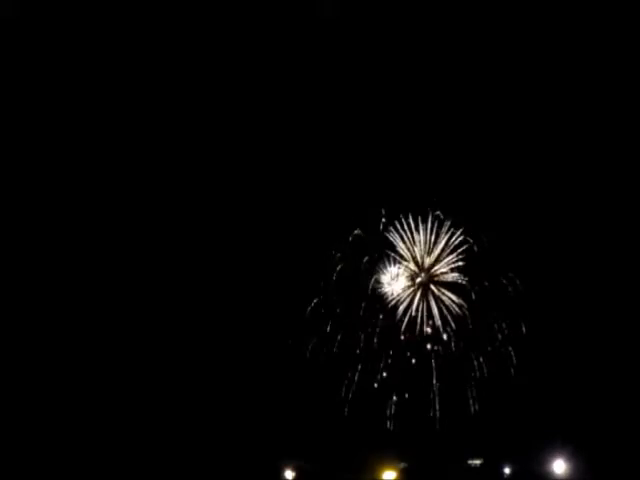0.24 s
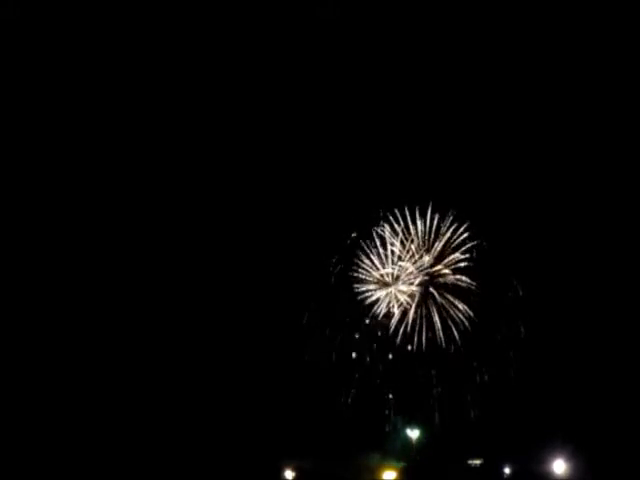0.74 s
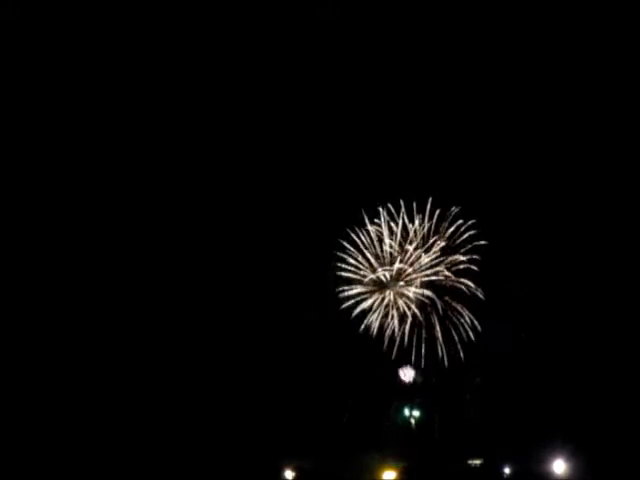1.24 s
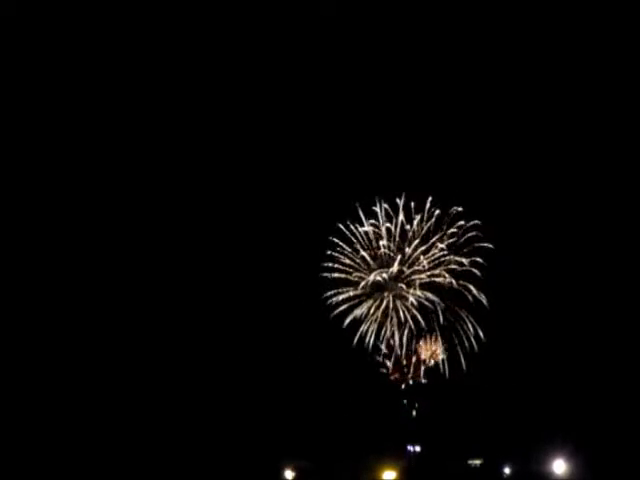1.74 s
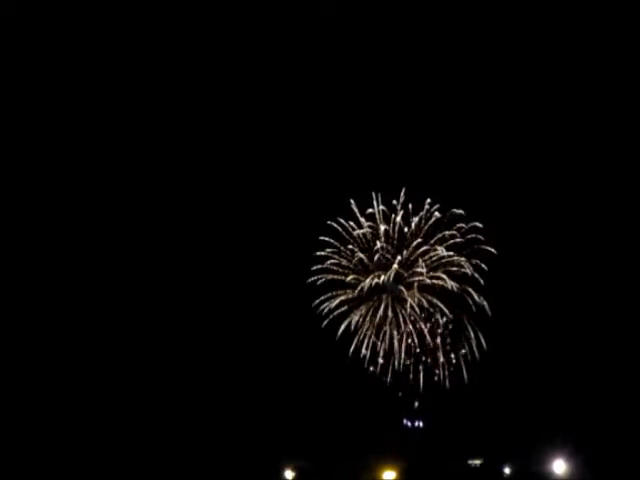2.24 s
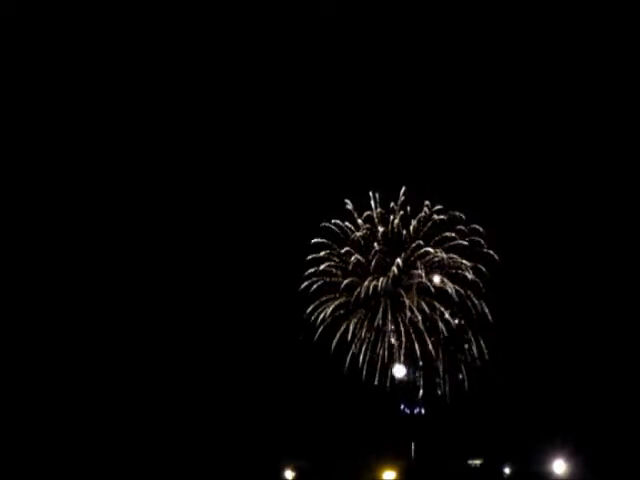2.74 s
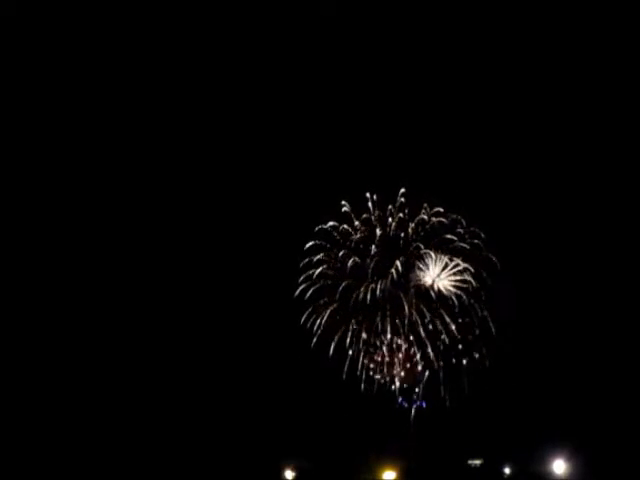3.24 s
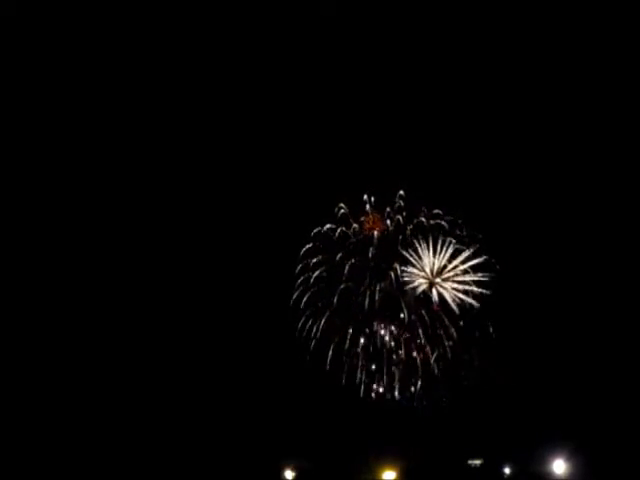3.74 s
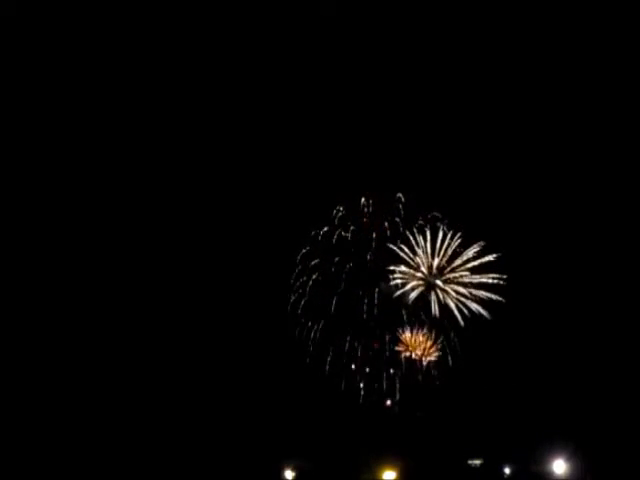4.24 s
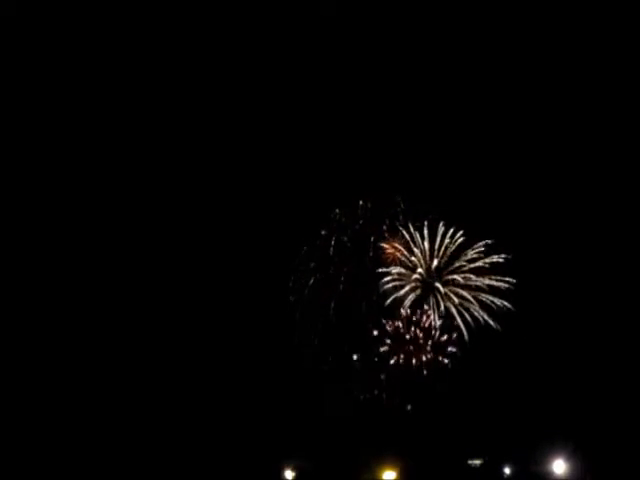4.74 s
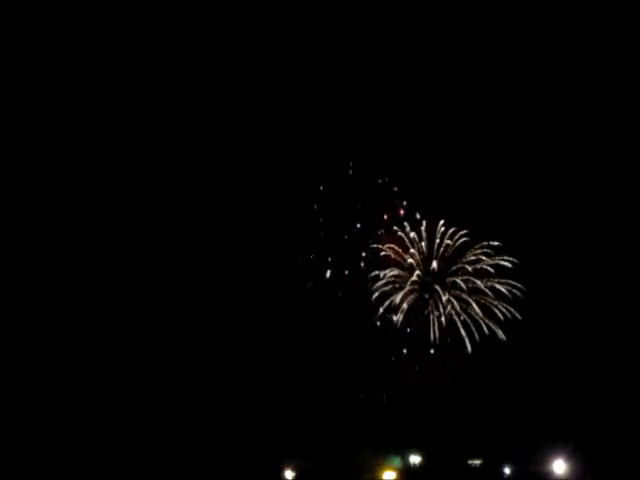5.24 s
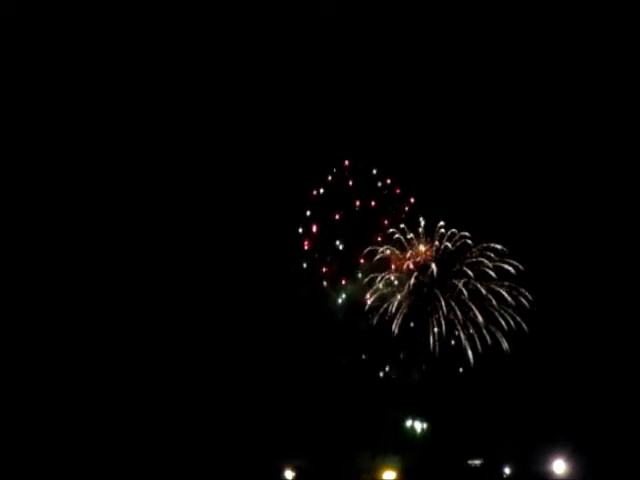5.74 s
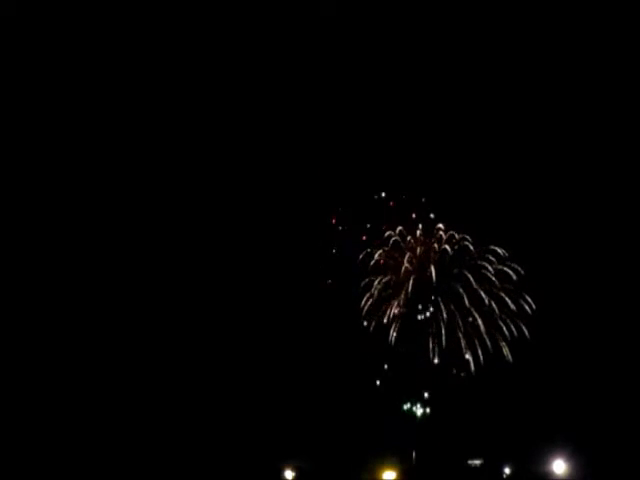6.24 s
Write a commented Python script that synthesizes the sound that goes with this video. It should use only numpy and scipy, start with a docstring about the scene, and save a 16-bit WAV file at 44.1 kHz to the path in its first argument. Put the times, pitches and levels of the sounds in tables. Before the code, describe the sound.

Fireworks burst over open country at night. One sharp bang comes early, then a softer one, then three loud bangs close together and two duller thuds, each with a short, dull echo. Small pops snap between them. Katydids buzz and crickets chirp steadily around the microphone over a low, far rumble, and frogs croak at the start and again near the end.

```python
"""Open country at night, with firework shells bursting overhead. Each shell sends a blast wave, followed by
its ground reflection and dull echoes; single stars give small sharp pops. Katydids buzz and crickets
chirp by stridulation, and frogs croak through throat resonances, over a far rumble, a drone and airy hiss.
The night is steady; it sounds quieter at first and rises as the recorder's gain slowly recovers.
Each big bang pushes the gain down, and it creeps back."""
import sys
import numpy as np
from scipy import signal
from scipy.fft import rfft, irfft
from scipy.io import wavfile
from scipy.ndimage import minimum_filter1d

SR = 44100
rng = np.random.default_rng(int(sys.argv[2]) if len(sys.argv) > 2 else 0)


def unload_wav(signal):
    """Save mono or channel-first audio to the path in sys.argv[1] as 16-bit WAV at rate SR, clipped to [-1, 1]."""
    wavfile.write(
        sys.argv[1],
        SR,
        np.round(np.clip(np.atleast_2d(signal).T, -1, 1) * 32767).astype(np.int16),
    )


N = 286650
TIME = np.arange(N) / SR
BLAST_SAMPLES, CUTOFF_HZ, SYLLABLE_S = 4096, 15800, .055


def from_db(db):
    """Amplitude ratio of a level in decibels."""
    return 10 ** (np.asarray(db) / 20)


def rms_one(x):
    """Normalisation to an rms of 1."""
    return x / np.sqrt(np.mean(x ** 2) + 1e-20)


def add(out, s, sound):
    """Superposition: a sound joins the mix at s seconds."""
    at = max(0, round(s * SR))
    out[at:at + len(sound)] += sound[:max(0, N - at)]


def cut(x, hz, kind, order=2):
    """Butterworth filtering."""
    return signal.sosfilt(signal.butter(order, hz, kind, fs=SR, output="sos"), x)


def resonate(x, hz, width_hz):
    """A damped resonance with a gain of 1 at its peak."""
    r = np.exp(-np.pi * width_hz / SR)
    feedback = [1, -2 * r * np.cos(2 * np.pi * hz / SR), r * r]
    return signal.lfilter(np.array([1, 0, -1]) * (1 - r * r) / 2, feedback, x + 1e-18)


def ring(x, hz, width_hz):
    """Two equal resonances in cascade; rms 1."""
    return rms_one(resonate(resonate(x, hz, width_hz), hz, width_hz))


def colour(x, spectrum):
    """Spectral shaping of a steady sound; rms 1."""
    hz, db = np.transpose(spectrum)
    bins = np.maximum(np.fft.rfftfreq(N, 1 / SR), 1)
    return rms_one(irfft(rfft(x) * from_db(np.interp(np.log(bins), np.log(hz), db)), N))


def noise(size=N):
    """Gaussian white noise."""
    return rng.standard_normal(size)


def drift(per_s):
    """Random modulation with a spread near 1."""
    knots = noise(2048)
    return np.interp(TIME * per_s, np.arange(len(knots)), knots)


def arch(length_s):
    """Progress from 0 to 1 through a note, and its rounded envelope."""
    progress = np.linspace(0, 1, int(length_s * SR))
    return progress, np.sqrt(np.abs(np.sin(np.pi * progress)))


def surge(s, half_width_s):
    """A Gaussian envelope, 1 at its height."""
    return np.exp(-.5 * ((TIME - s) / half_width_s) ** 2)


def delayed(x, ms):
    """Propagation delay: the same sound arrives later."""
    steps = np.arange(len(x))
    return np.interp(steps - ms * SR / 1000, steps, x, left=0)


def diffuse_tail(size, decay_s):
    """Diffuse reflections merge into exponentially decaying noise; unit energy."""
    tail = noise(size) * np.exp(-TIME[:size] / decay_s)
    return tail / np.linalg.norm(tail)


def through_brush(x, wet, smear_s):
    """Scattering by leaves and stems smears an animal's call in time."""
    scattered = signal.fftconvolve(x, diffuse_tail(SR // 2, smear_s))[:N]
    return (x + wet * scattered) / np.hypot(1, wet)


def drone(db=-43.5):
    """Noise confined to the lowest frequencies is heard as a far drone."""
    # Each row: frequency in Hz, relative spectral density in dB.
    spectrum = [(12, -20), (25, -8), (45, -1), (68, 0.5), (90, 2), (120, -10), (200, -30), (500, -69)]
    return from_db(db) * colour(noise(), spectrum)


def rumble(db=-43, waver_db=1.2):
    """Slow amplitude modulation makes a far, low noise waver and roll."""
    # Each row: frequency in Hz, relative spectral density in dB.
    spectrum = [(30, -8), (70, -4), (115, -2), (170, -1), (240, -2), (310, -4), (480, -11.5), (780, -23.5),
                (1200, -41.5)]
    # Each row: time of a roll's height in seconds, half width in seconds, rise in dB.
    rolls = [(3.95, 0.56, 4), (5.9, 0.23, 4.5)]
    rolls_db = sum(rise_db * surge(s, half_width_s) for s, half_width_s, rise_db in rolls)
    return from_db(db + rolls_db + waver_db * drift(12)) * colour(noise(), spectrum)


def air(db=-52, breeze_db=2.5):
    """The air's broadband hiss rises once in a soft breeze."""
    # Each row: frequency in Hz, relative spectral density in dB.
    spectrum = [(440, -7), (780, -17.5), (930, 3), (1100, -2.5), (1500, -1.5), (1960, -4.5), (2950, -16),
                (3700, -14), (4400, -26), (5200, -71), (8000, -81.5)]
    return from_db(db + breeze_db * surge(s=3.4, half_width_s=.43)) * colour(noise(), spectrum)


def wing_strokes(stroke_hz, stroke_s, wander):
    """The envelope of stridulation: one short pulse for each closing of the wings; rms 1."""
    phase = np.cumsum(stroke_hz * (1 + wander * drift(2.78))) / SR
    return rms_one(np.exp(-.5 * ((phase % 1 - .5) / (stroke_hz * stroke_s)) ** 2))


def katydids(db=-37.5, farther_db=-7, chorus_db=.16):
    """Stridulation: two katydids rasp in pulses of noise, while many more merge into a smooth hiss."""
    # Each row: frequency in Hz, relative spectral density in dB.
    spectrum = [(4000, -32), (4750, -51.5), (5500, -32), (6300, -27), (7000, -20), (8050, -5), (8950, -2),
                (9930, -3.5), (11000, -11), (12000, -18.5), (13800, -26.5), (15500, -26), (17000, -9)]
    near = wing_strokes(stroke_hz=138.6, stroke_s=.00062, wander=.0028) * noise()
    farther = wing_strokes(stroke_hz=130.1, stroke_s=.000928, wander=.0031) * noise()
    chorus = from_db(chorus_db) * noise()
    return from_db(db) * colour(near + from_db(farther_db) * farther + chorus, spectrum)


def small_katydid(stroke_hz=307, width_hz=600, wander=.0013):
    """Impulse excitation: fast, even strokes ring a tiny wing in short, high buzzes."""
    # Each row: start of a buzz in seconds, level in dB.
    buzzes = [(1.32, -51), (2.83, -43.5), (5.68, -48)]
    # Two parts overlap. Each row: delay and length in seconds, resonance in Hz, relative level in dB.
    parts = [(0, .22, 12000, -10), (0.052, 0.4, 10900, -5)]
    out = np.zeros(N)
    for s, db in buzzes:
        for delay_s, length_s, hz, part_db in parts:
            progress, envelope = arch(length_s)
            phase = np.cumsum(stroke_hz * (1 + wander * drift(12)[:len(progress)])) / SR
            strokes = np.diff(np.floor(phase), prepend=0)
            add(out, s + delay_s, from_db(db + part_db) * envelope * ring(strokes, hz, width_hz))
    return out


def trills(length_s=.0433, jitter_s=.003, uneven_db=2, count=100, pause_at_s=2.9):
    """Far crickets stridulate in falling glides; the low ones pause once, as if startled."""
    # Each row: start and period in seconds, first and last pitch in Hz, level in dB, pause in seconds.
    trillers = [(.020, .07587, 4380, 3830, -61.8, .62), (.016, .0731, 4350, 3820, -65, .62),
                (.062, .079, 5640, 5430, -55.2, 0), (.033, .0718, 5470, 5220, -58.5, 0)]
    out = np.zeros(N)
    progress, envelope = arch(length_s)
    for first_s, period_s, start_hz, end_hz, db, pause_s in trillers:
        pitch = start_hz + (end_hz - start_hz) * progress
        tone = envelope ** 2 * np.sin(2 * np.pi * np.cumsum(pitch) / SR)
        for k, (late, level) in enumerate(rng.standard_normal((count, 2))):
            s = first_s + k * period_s + jitter_s * late
            if not pause_at_s < s < pause_at_s + pause_s:
                add(out, s, from_db(db + uneven_db * level) * tone)
    return through_brush(out, wet=.6, smear_s=.0067)


def syllable(hz, bend=340, rough=.057):
    """One cricket wing stroke radiates a near-pure tone that climbs to its pitch and sags a little."""
    progress, envelope = arch(SYLLABLE_S)
    pitch = hz - bend * (progress - .65) ** 2
    flutter = 1 + rough * rms_one(cut(noise(len(progress)), 170.2, "low"))
    return envelope ** 2 * flutter * np.sin(2 * np.pi * np.cumsum(pitch) / SR)


def crickets(gap_s=.01, far_db=-64.5, far_count=250, choir_db=-65):
    """Stridulation: near crickets chirp in runs, far ones at random; the farthest merge into a shimmer."""
    # Each row: pitch in Hz, level in dB, syllables per chirp, chirp starts in seconds.
    chirpers = [(5555, -48.8, 3, [.16, 1.96, 2.67, 3.47, 4.15, 4.86, 5.46, 6.14]),
                (5715, -49.5, 3, [.48, 3.04, 4.99, 5.69]), (5070, -52.5, 3, [.48, 1.24, 3.44, 4.26, 4.55]),
                (5970, -58, 3, [.56, 1.19, 3.27, 4.07, 6.17])]
    near, far = np.zeros(N), np.zeros(N)
    for hz, db, syllables, starts in chirpers:
        for s in starts:
            for k in range(round(syllables)):
                stroke = syllable(hz + 20 * rng.standard_normal())
                add(near, s + k * (SYLLABLE_S + gap_s), from_db(db) * stroke)
    for when, pitch, level in rng.random((far_count, 3)):
        add(far, when * N / SR, from_db(far_db + 7.1 * level) * syllable(5220 + 480 * pitch))
    choir = ring(noise(), hz=5480, width_hz=430)
    far = through_brush(far, wet=1, smear_s=.023) + from_db(choir_db) * choir
    return through_brush(near, wet=.6, smear_s=.02) + far


def croak(ratio, levels_db, length_s=.084, pulse_hz=108, uneven=.07):
    """Source and filter: dry, slightly uneven pulses excite two throat resonances."""
    # Each row: resonance in Hz, bandwidth in Hz.
    modes = [(1355, 197), (3020, 320)]
    progress, envelope = arch(length_s)
    phase = np.cumsum(pulse_hz * (1 + uneven * drift(120)[:len(progress)])) / SR
    pulses = np.diff(np.floor(phase + .91), prepend=0) * from_db(2 * noise(len(phase)))
    throat = ratio * (1 + .01 * np.clip(rng.standard_normal(), -2, 2))   # set anew for each croak
    return envelope * sum(from_db(db) * ring(pulses, hz * throat, width_hz)
                          for (hz, width_hz), db in zip(modes, levels_db))


def frogs():
    """Three frogs croak periodically, each at its own pace, so that their calls interleave."""
    # Each row: tuning ratio, levels of the low and high resonance in dB, bouts.
    # Each bout: start in seconds, number of croaks, period in seconds.
    callers = [(0.978, -43, -52, [(.045, 4, 0.33), (5.655, 3, .26)]), (1.003, -48.5, -52.5, [(.268, 3, .31),
               (5.78, 2, .265)]), (0.967, -44.5, -61.5, [(.165, 3, .497), (5.742, 3, .213)])]
    out = np.zeros(N)
    for ratio, low_db, high_db, bouts in callers:
        for first_s, croaks, period_s in bouts:
            for k in range(round(croaks)):
                add(out, first_s + k * period_s, croak(ratio, [low_db, high_db]))
    return through_brush(out, wet=.45, smear_s=.035)


def countryside(x, near_db=-26, far_db=-28):
    """Reverberation: trees and fields give back a short dull flutter and a faint long roll."""
    near = from_db(near_db) * diffuse_tail(2 * SR, decay_s=.1)
    far = from_db(far_db) * diffuse_tail(2 * SR, decay_s=.42)
    return cut(signal.fftconvolve(x, delayed(near + far, ms=7.02))[:N], [110, 650], "band")


def pops(decay_s=.0011, ragged=.06, bottom_ratio=.25):
    """A star's small charge radiates a band-limited impulse: a thin snap with a ragged end."""
    # Each row: start in seconds, peak level in dB, top of the spectrum in Hz.
    stars = [(1.1300, -31.5, 2780), (2.5329, -25, 3100), (3.7851, -16.5, 3100), (3.852, -30.5, 1190),
             (4.0327, -27, 2916), (4.9752, -26.5, 3280), (5.042, -31, 2630), (6.1491, -24, 2540)]
    out, t = np.zeros(N), TIME[:BLAST_SAMPLES]
    for s, db, top_hz in stars:
        low_hz = bottom_ratio * top_hz
        snap = (t == 0) + ragged * noise(len(t)) * np.exp(-t / decay_s)
        snap = cut(cut(snap, low_hz, "high"), 2 * low_hz, "low", order=1)
        snap = cut(snap, top_hz, "low", order=8)
        add(out, s, from_db(db) * snap / np.abs(snap).max())
    return out


def crackle(decay_s=.0024, tail_db=-30, tail_s=.088):
    """Scattering by turbulence and grass breaks a shock front into a short ragged crackle."""
    # Nearby surfaces reflect it. Each row: delay in milliseconds, relative amplitude.
    slaps = [(20.5, 0.16), (60, 0.058)]
    t = TIME[:BLAST_SAMPLES]
    fading = np.exp(-t / decay_s) + from_db(tail_db) * np.exp(-t / tail_s)
    grain = rms_one(cut(noise(len(t)), [1000, 2450], "band"))
    direct = cut(grain * fading, [800, 3900], "band")
    return direct + sum(share * delayed(direct, ms) for ms, share in slaps)


def blast_wave(push_ms, front_share, body_hz=280, front_hz=2500):
    """A blast wave is a jump in pressure that falls through zero into suction; peak 1."""
    age = TIME[:BLAST_SAMPLES] * 1000 / push_ms
    decay = np.exp(-age)
    pressure = (1 - age) * decay
    pressure -= pressure.sum() * decay / decay.sum()   # push and suction balance
    # The air rounds most of the wave; a share of the steep front survives.
    front = cut(cut(pressure, front_hz, "low", order=1), front_hz, "low", order=1)
    wave = cut(pressure, body_hz, "low") + front_share * front
    wave = cut(cut(wave, 89, "high"), 22, "high", order=1)
    return wave / np.abs(wave).max()


def bangs(grazing_bounce=.76, bounce_fade_ms=4.5, bounce_hz=430, octaves_per_db=.04):
    """Interference: each shell's blast wave adds to its reflections, with a hollow knock and a crackle."""
    # Each row: start in seconds, level in dB, overpressure length in milliseconds, shock front share,
    # relative crackle level in dB, knock gain, knock pitch in Hz, ground bounce delay in milliseconds.
    shells = [(0.4539, 4.5, 1.04, 0.29, -21.5, 1.3, 534, 4.9),
              (1.8515, -8.5, 0.51, 0.04, -19, 1.05, 368, 2.2), (3.1019, 3, 0.68, 0.15, -20, 1, 383, 4.88),
              (3.3574, 9, 1.11, 0.21, -25, 0.29, 330, 5.3), (4.2943, 11, 0.87, 0.32, -23.5, 0.34, 365, 5),
              (5.4651, -4.5, 1.13, 0.002, -22.5, 1.9, 364, 2.28),
              (5.8585, -1.8, 1.54, 0.037, -22.5, 0.3, 230, 3.6)]
    # Nearby ground and objects echo. Each row: delay in milliseconds, amplitude relative to the bounce.
    echoes = [(8.33, 0.38), (16.5, 0.3187), (23.4, 0.33), (29.5, 0.22)]
    out = np.zeros(N)
    for s, db, push_ms, front_share, crackle_db, knock_gain, knock_hz, bounce_ms in shells:
        direct = blast_wave(push_ms, front_share)
        # A low shell's wave grazes the ground, which returns it sooner and stronger.
        bounce = grazing_bounce * np.exp(-bounce_ms / bounce_fade_ms)
        returns = delayed(direct, bounce_ms) + sum(share * delayed(direct, ms) for ms, share in echoes)
        reflected = bounce * cut(returns, bounce_hz, "low", order=1)
        knock = knock_gain * resonate(direct, knock_hz, width_hz=39)
        wave = direct + reflected + knock + from_db(crackle_db) * crackle()
        # At grazing angles soft ground swallows the low mids.
        wave -= 1.7 * bounce * resonate(wave, hz=774, width_hz=180)
        top_hz = min(4600 * 2 ** (octaves_per_db * db), CUTOFF_HZ)   # a stronger burst is brighter
        add(out, s, from_db(db) * cut(wave, top_hz, "low", order=4))
    return out


def scene(start_gain_db=-5, recovery_start_s=1.38, recovery_length_s=1.61, drone_follows=.58):
    """Superposition of fireworks and a steady night, which a set ramp lifts as the gain recovers."""
    recovery_db = start_gain_db * (1 - np.clip((TIME - recovery_start_s) / recovery_length_s, 0, 1))
    animals = katydids() + crickets() + trills() + frogs()
    night = from_db(recovery_db) * (animals + rumble() + air())
    night += from_db(drone_follows * recovery_db) * drone() + small_katydid()
    fireworks = bangs() + pops()
    return (fireworks + countryside(fireworks) + night)[None]


def gain_control(x, threshold_db=-.5, slope=.9, release_s=.65):
    """Compression: peaks over the threshold pull the gain down at once; it creeps back."""
    level_db = 20 * np.log10(np.abs(x).max(axis=0) + 1e-9)
    over_db = slope * np.maximum(level_db - threshold_db, 0)
    fading = np.exp(-TIME / release_s)
    held_db = np.maximum.accumulate(over_db / fading) * fading
    return x * from_db(minimum_filter1d(-held_db, size=65))


def record(dry):
    """Compression, clipping at full scale, and a steep low-pass filter."""
    clipped = np.clip(gain_control(dry), -1, 1)
    return signal.sosfilt(signal.ellip(10, .1, 80, CUTOFF_HZ, fs=SR, output="sos"), clipped)


dry = scene()
out = record(dry)
unload_wav(out)
```